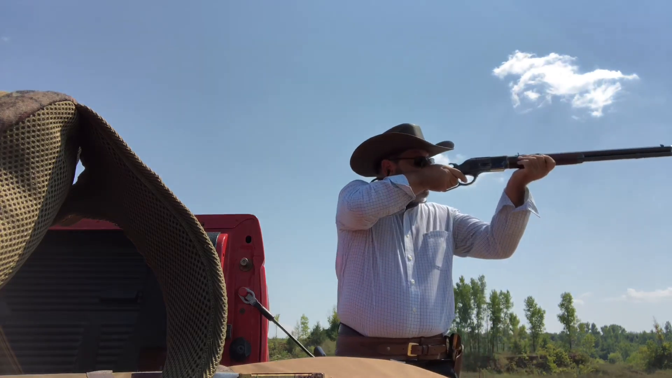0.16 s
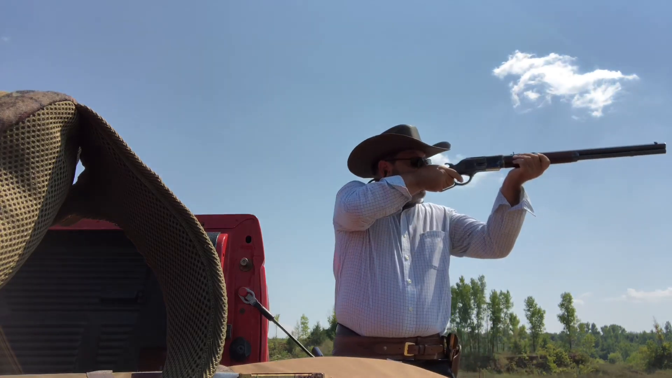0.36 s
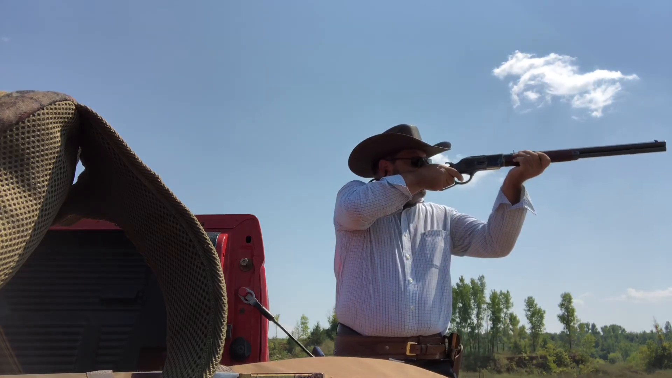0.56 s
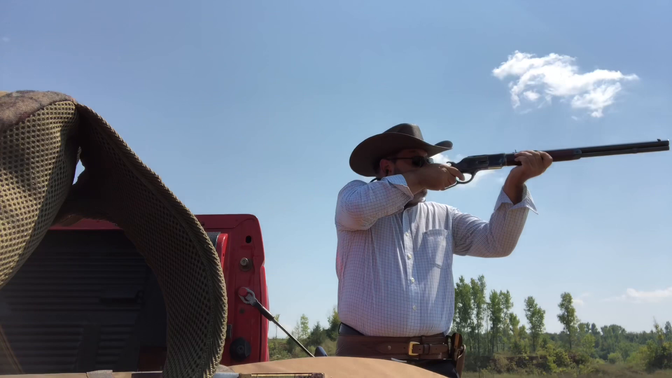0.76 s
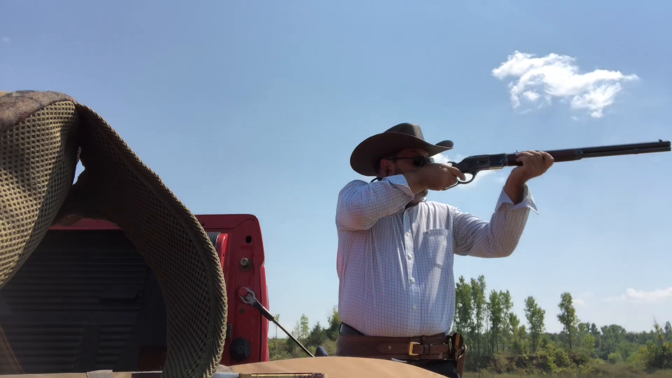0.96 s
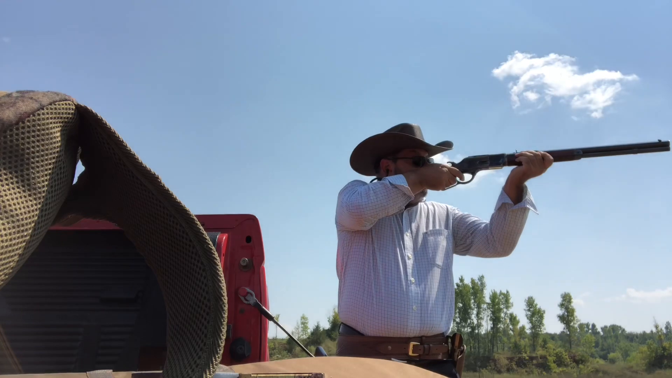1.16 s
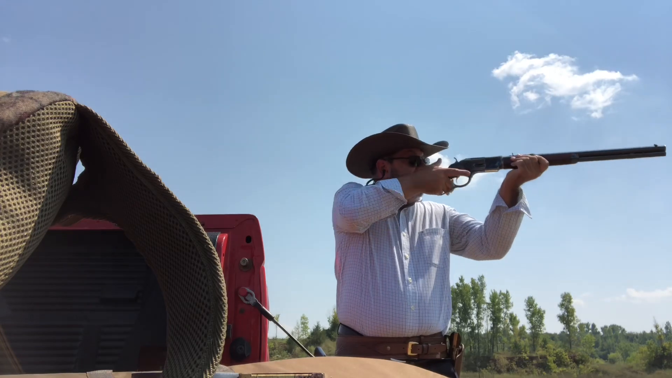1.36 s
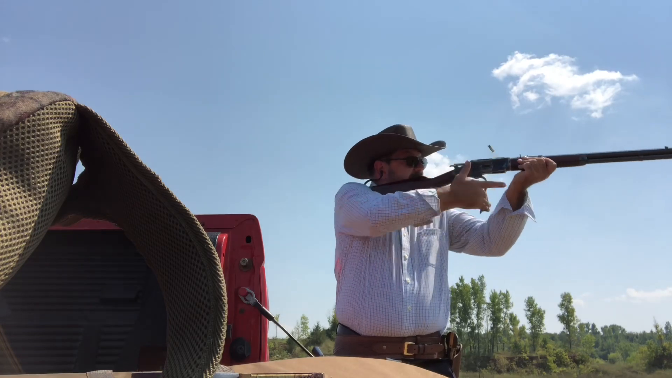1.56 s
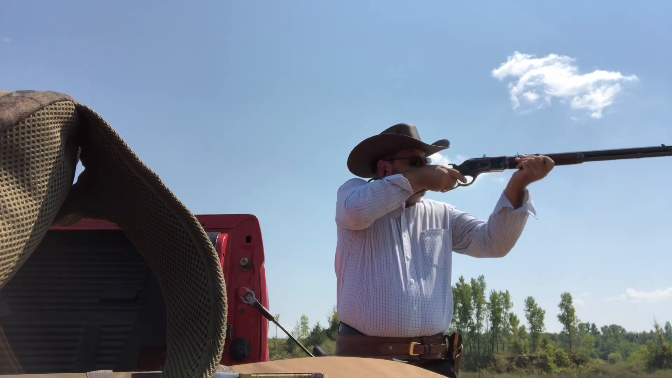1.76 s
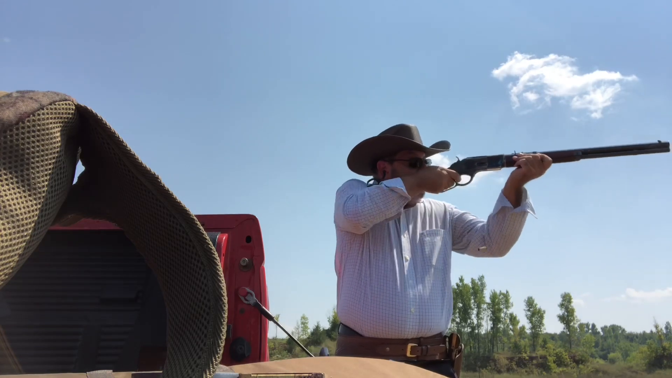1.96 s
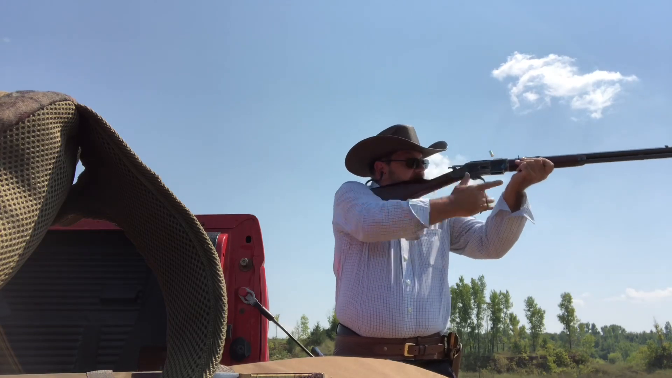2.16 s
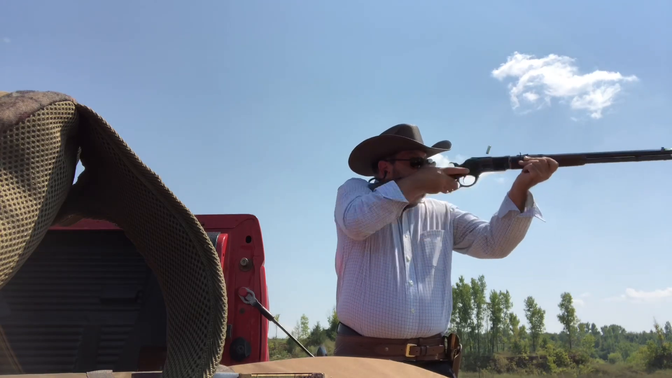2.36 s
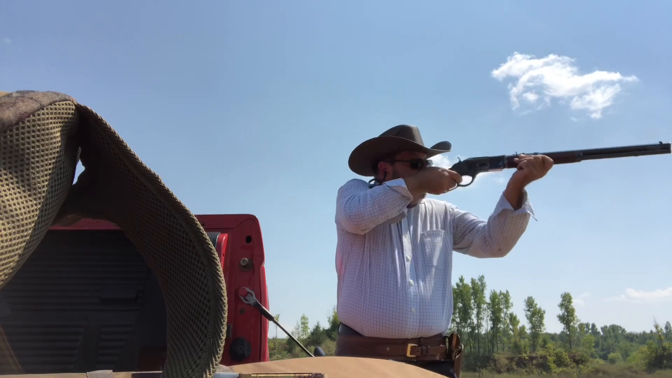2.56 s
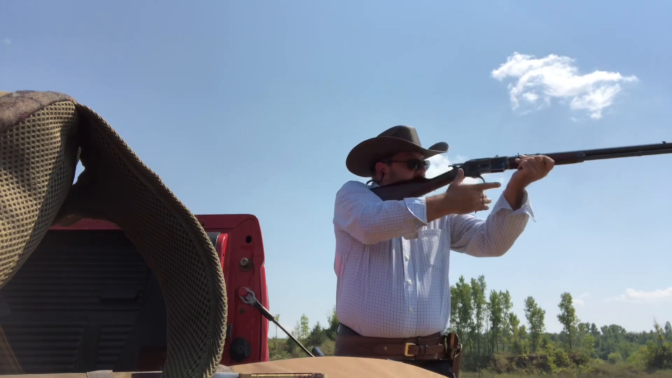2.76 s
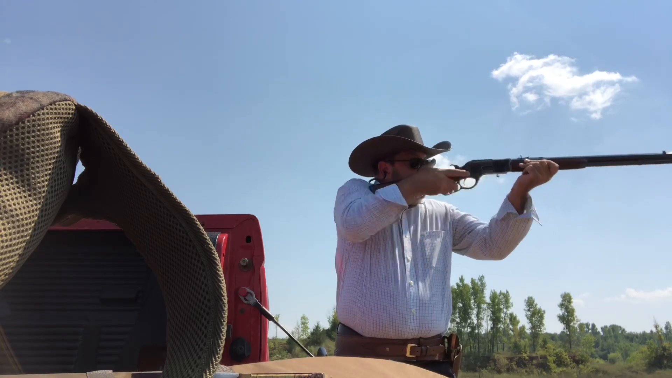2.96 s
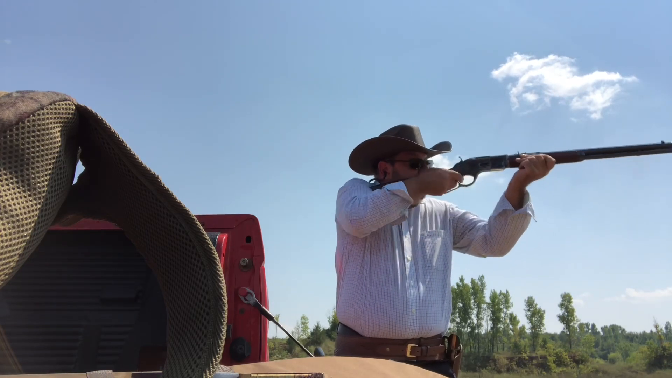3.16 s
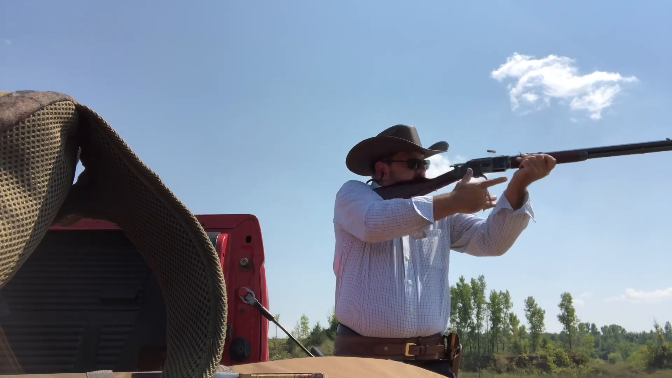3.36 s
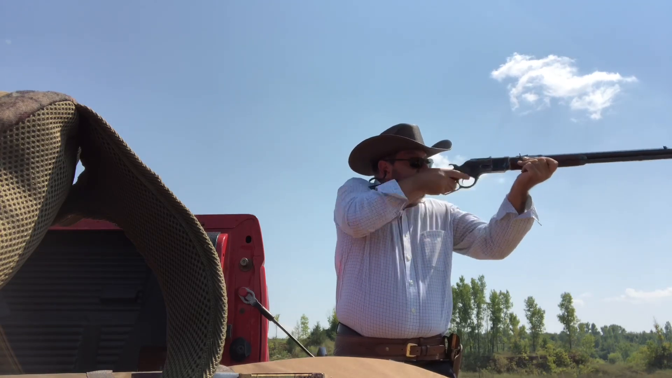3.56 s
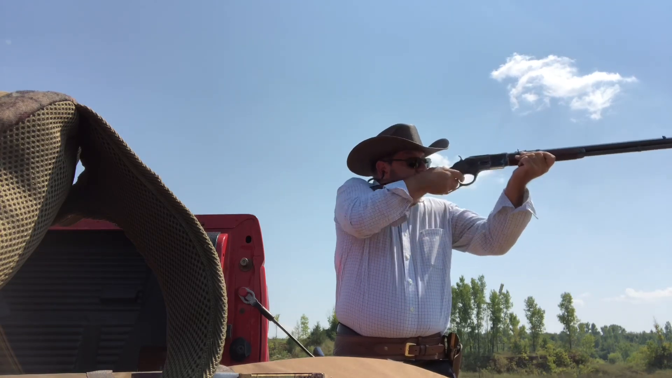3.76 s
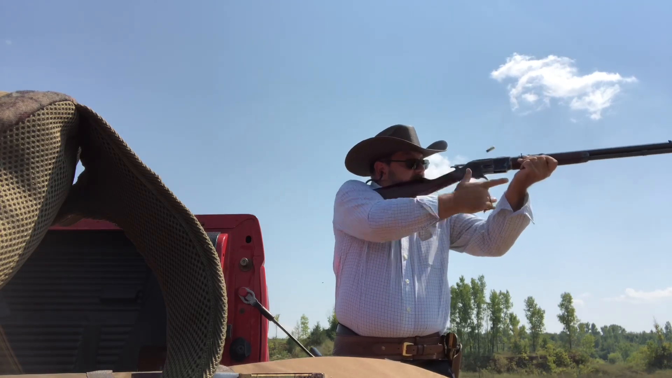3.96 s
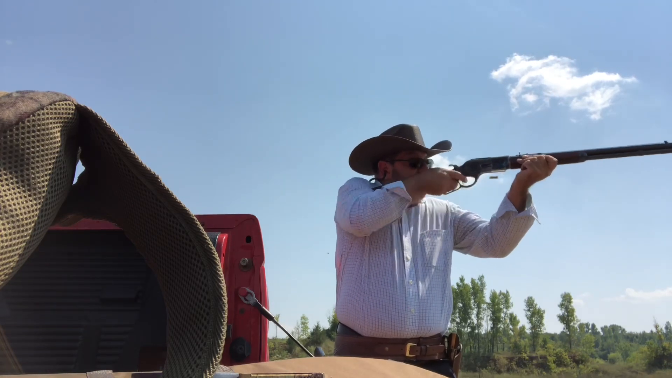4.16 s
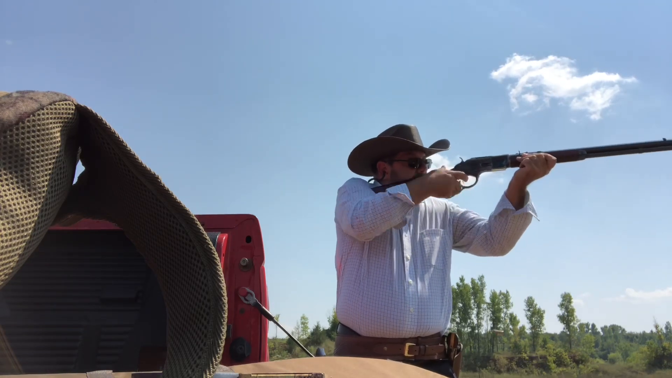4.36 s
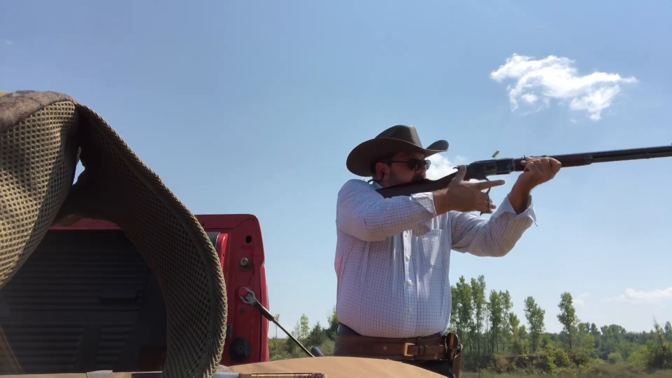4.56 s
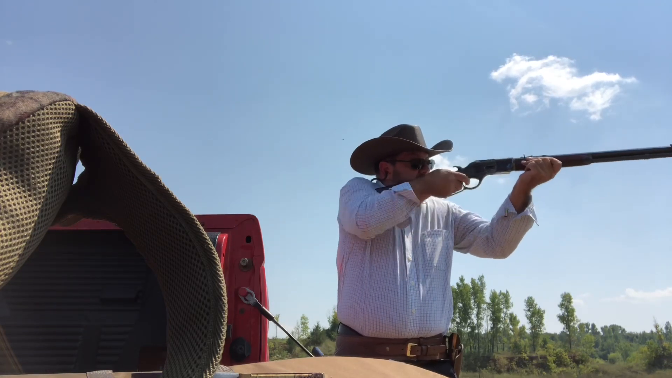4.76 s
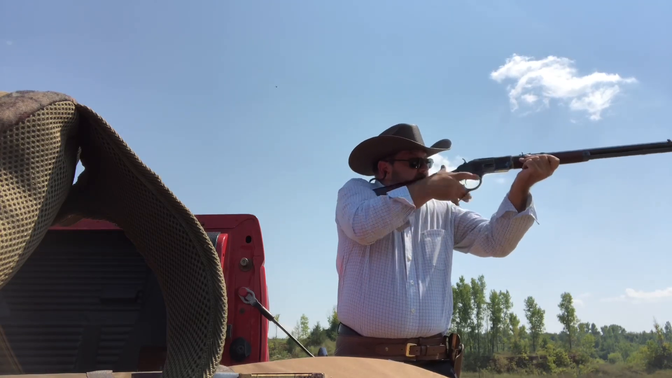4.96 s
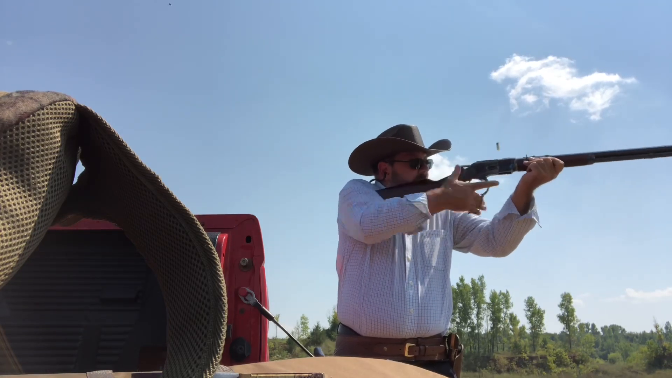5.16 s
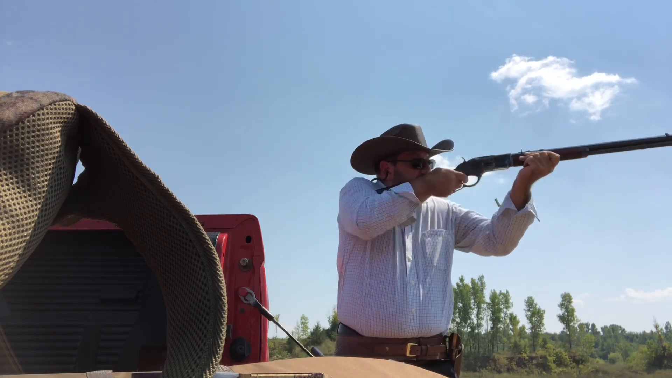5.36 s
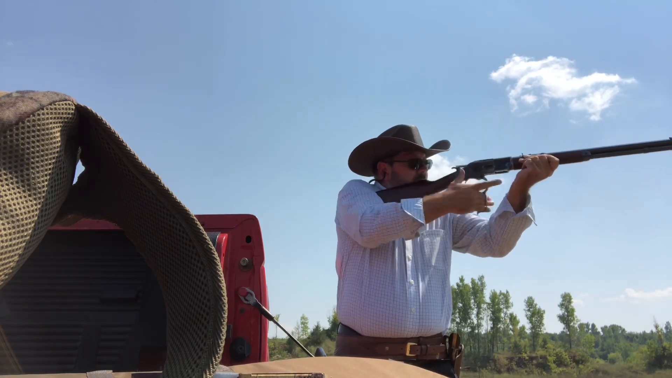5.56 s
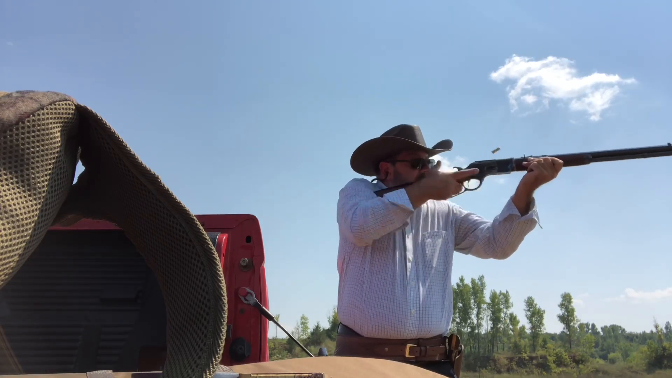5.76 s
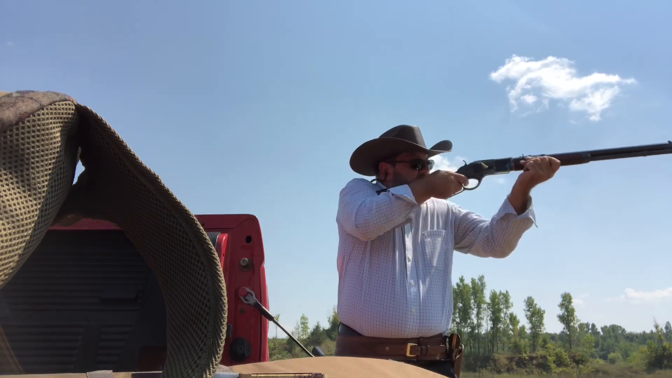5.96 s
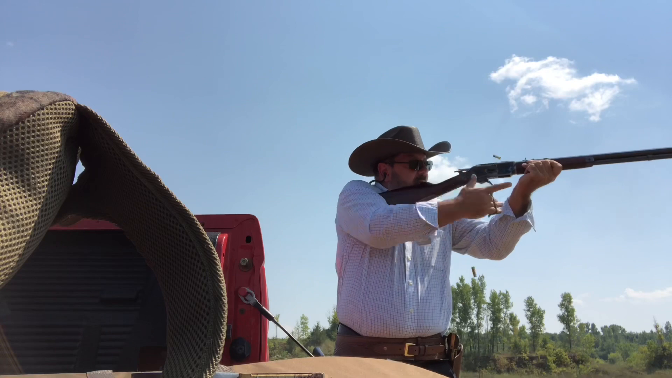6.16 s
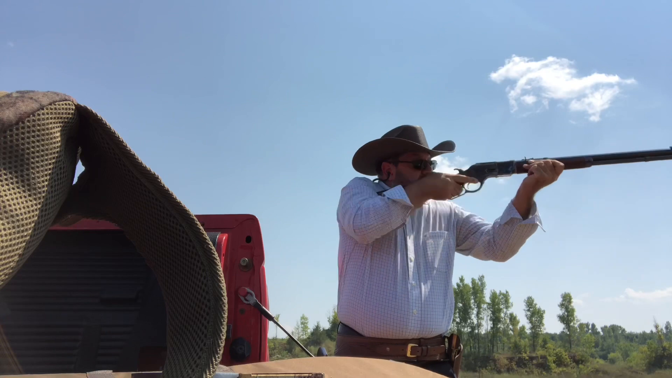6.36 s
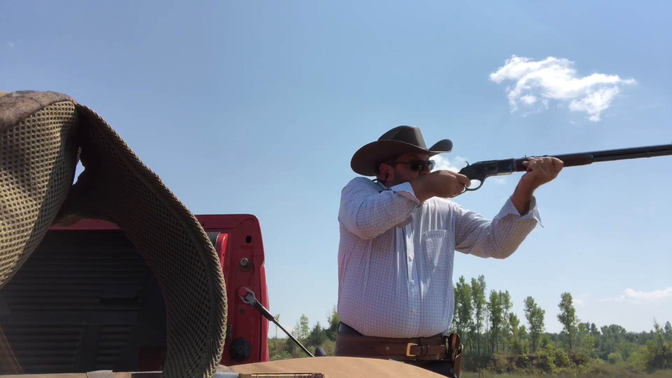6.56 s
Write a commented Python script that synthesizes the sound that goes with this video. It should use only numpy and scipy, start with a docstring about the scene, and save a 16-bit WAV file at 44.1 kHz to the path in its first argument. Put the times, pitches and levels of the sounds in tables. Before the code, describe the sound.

After a moment of low wind, rapid sharp rifle blasts ring out in open air, with steel clack-clack cycling and short scattered echoes.

```python
"""Outdoor shooting range: a lever-action rifle fires ten quick shots, heard beside a pickup truck.
Each blast is shaped noise over a gliding low thump; truck, ground, berm and trees answer in decaying noise.
After each of the first nine, a bullet smacks a target in a noise splash and the lever is thrown:
gritty noise scrapes, and steel contacts clack as noise cracks with ringing modes.
A low rumble of wind drops in level at the first shot, then creeps back, over a steady faint hiss of air."""
import sys
import numpy as np
from scipy import signal
from scipy.fft import rfft, irfft, next_fast_len
from scipy.io import wavfile
from scipy.ndimage import uniform_filter1d, map_coordinates

SR = 44100
rng = np.random.default_rng(int(sys.argv[2]) if len(sys.argv) > 2 else 0)


def persist_wave(psi):
    """Save psi, clipped to +-1, as 16-bit WAV."""
    counts = np.round(np.clip(psi, -1, 1) * 32767).astype(np.int16)
    wavfile.write(sys.argv[1], SR, np.atleast_2d(counts).T)


N = 291545  # length of the scene [samples]

# Wind rumble and open-air hiss, spectral shapes: (frequency [Hz], relative density [dB])
RUMBLE_SPECTRUM = [(25, -20), (55, -18.5), (78, -2.5), (93, -5.5), (110, -3), (135, -9.5), (200, -16.5),
                   (300, -21), (500, -44.5), (1000, -67.5)]
AIR_SPECTRUM = [(25, -22.5), (70, 1), (170, 6), (400, 0.5), (1100, -9), (3500, -11.5), (7000, -18),
                (13000, -32), (16000, -33.5)]
RUMBLE_DB, RUMBLE_WAVER_DB = -52, 2.3  # the rumble before the first shot, and its random waver
# the rumble drops in level at the first shot, then creeps back
RUMBLE_DROP_DB, RUMBLE_DROP_S, RUMBLE_RETURN_DB_PER_S = 30, .08, 1
GUST_S, GUST_WIDTH_S, GUST_DB = .68, 0.14, 3  # one soft gust

# Answers from truck and ground, open range, earth bank and tree line:
# (frequency [Hz], relative density [dB])
NEARBY_SPECTRUM = [(50, -14.5), (130, -12), (240, 5.5), (320, -2.5), (530, -2.5), (1000, 3.5), (1450, -0.5),
                   (1900, -5), (2700, -5), (4200, -7.5), (7000, -13.5), (10000, -18), (15500, -22.5)]
RANGE_SPECTRUM = [(40, -19), (120, 3.5), (350, 1.5), (550, 0), (850, 1.5), (1350, -9.5), (1900, -23.5),
                  (3000, -22), (5500, -24), (9000, -24), (15500, -21.5)]
BERM_SPECTRUM = [(60, -35), (130, -6.5), (190, -5), (300, -3.5), (500, -1.5), (800, -15), (1500, -11),
                 (4000, -27)]
TREES_SPECTRUM = [(50, -32.5), (170, -2), (350, -25), (800, -5), (1300, -10), (2000, -9), (3500, -6.5),
                  (5500, -11.5), (7500, -30.5), (15000, -44.5)]
# Decay of the open range: (frequency [Hz], time to fall 60 dB [s])
RANGE_DECAY = [(80, 0.32), (300, 0.39), (900, 0.48), (2500, 1), (5500, 1), (12000, 0.31)]
# Fade of the close reflections: (time after the blast's centre [s], relative level [dB])
NEARBY_FADE = [(0, -20.0), (.004, -25.0), (.012, -26.5), (.023, -23),
               (.034, -34.5), (.052, -36), (.075, -59), (.16, -71.0)]
ECHO_DB = -2  # the surroundings answer every shot at the same level
# Modes of the truck's panels: (frequency [Hz], relative level [dB])
TRUCK_MODES = [(210, -29), (396, -29), (525, -18.5), (743, -29), (925, -25.5), (1265, -34), (1452, -26),
               (1560, -46), (2240, -35), (2500, -26.5), (3040, -30.5), (3400, -34), (5080, -42)]
PANEL_T60_S = .085

# Bullets striking the targets: (time [s], relative level [dB])
TARGET_STRIKES = [(1.4258, -20.5), (2.1397, -27.5), (2.7632, -20), (3.3474, -26), (3.894, -20),
                  (4.4753, -30), (5.0279, -13.5), (5.5732, -30), (6.1265, -32)]
# Splash of a strike: (frequency [Hz], relative density [dB])
SPLASH_SPECTRUM = [(800, -40.5), (2200, -9.5), (3200, 0.5), (5500, -4.5), (8000, -9.0), (15000, -18.5)]

# Throws of the lever: (unlocked [s], fully open [s], cartridge seated [s], bolt shut [s],
# lever latched [s], relative level [dB], extra level of latch and rebound [dB])
LEVER_THROWS = [(1.5284, 1.5984, 1.7609, 1.7957, 1.8202, .5, -1),
                (2.2144, 2.2723, 2.4446, 2.4803, 2.5117, 1, 4.5),
                (2.815, 2.9004, 3.0629, 3.0954, 3.1203, .5, 2.5),
                (3.3923, 3.468, 3.6342, 3.6665, 3.689, -1, -12),
                (3.953, 4.0398, 4.2054, 4.2373, 4.2633, 0, 0),
                (4.5292, 4.6268, 4.7603, 4.8021, 4.8144, -.5, -6),
                (5.1096, 5.1896, 5.3317, 5.3657, 5.3882, 0, -1),
                (5.6373, 5.7078, 5.8732, 5.9103, 5.9352, -.5, -8),
                (6.2, 6.2707, 6.4355, 6.4499, 6.47, -1.5, -14)]
# Steel contacts of a throw, by name: (relative level [dB], low-end tilt [dB before scaling],
# treble tilt [dB before scaling])
STEEL_CONTACTS = {"unlock": (-28.5, -23, -14.5), "eject": (-32, 1.8, -9), "open": (-21, -3.5, -5),
                  "lift": (-30.5, -0.5, -8), "feed": (-29, 3.4, -15), "ramp": (-27.5, -7, -0.91),
                  "seat": (-13, -13, -6), "shut": (-20.5, 1.7, -8.5), "latch": (-26.5, 1, -6.5),
                  "rebound": (-38, 3.6, -11)}
# Steel crack and sliding rub, spectral shapes: (frequency [Hz], relative density [dB])
STEEL_SPECTRUM = [(180, -38), (300, -31), (1140, 3.5), (2320, -4), (2610, -6), (2880, -4.5), (4590, -12.5),
                  (5080, -3), (8640, -15), (9550, -4.5), (11100, -18), (13500, -15.5), (16000, -9)]
SCRAPE_SPECTRUM = [(300, -33), (700, -3), (1250, 3.5), (2100, -6.5), (2350, 0), (3000, -7.5), (6000, -12),
                   (9500, -16), (11500, -29), (16000, -15.5)]
# Modes of the rifle's action: (nominal frequency [Hz], relative level [dB])
ACTION_MODES = [(1080, 3.5), (1250, 10), (1600, 4), (1820, 6.5), (2330, 5), (3500, -6.5), (5400, -1),
                (6700, 7), (7900, 9), (9700, -5.5), (10500, 1.5), (13000, -9.5)]
RING_FALL = 0.2  # higher modes die sooner: t60 falls with this power of frequency
EJECT_LEAD_S = 0.027  # the case flies out just before the rear stop
LIFT_LEAD_S, FEED_LEAD_S, RAMP_LEAD_S = .045, .027, 0.019  # the next round's steps before it seats
REBOUND_S = .0185  # the latched lever rattles once more
# Slides around the rear stop and the seating: (lead [s], overrun [s], level [dB])
OPENING, CLOSING = (0.041, 0.025, -45.5), (.066, .064, -43.5)

# Shots: (blast centre [s], level of blast, lead-in, body and panels [dB], blast length [s],
# relative thump level [dB], relative level of the knock before it [dB])
RIFLE_SHOTS = [(1.2912, 1.5, 0.0074, -9, -4), (2.0098, 0.5, 0.004, -3, -0.5), (2.634, .5, 0.0036, 2, -30),
               (3.2169, -1.5, 0.0056, 1.5, -14), (3.763, -1.5, 0.0052, 2.5, -9.5),
               (4.3544, 2.5, 0.0025, 4, -15), (4.897, 0, 0.0038, .5, -8.5), (5.4305, 1.5, 0.0035, -7, 1),
               (5.988, -0.5, 0.004, 1.5, 0), (6.5634, -0.5, 0.0043, 1.5, 0.5)]
# Blast and the rising noise that leads into it, spectral shapes: (frequency [Hz], relative density [dB])
BLAST_SPECTRUM = [(60, -18), (200, -11), (400, -16.5), (600, -0.5), (1100, -7.5), (1950, -16), (2800, -8.5),
                  (3900, -7.5), (4600, -12), (5300, -16), (9500, -15), (11500, -21.5), (15500, -19.5)]
LEAD_IN_SPECTRUM = [(60, -26), (250, -18.5), (420, -17.5), (570, -5.5), (730, -8), (1000, -2), (1320, -23),
                    (1600, 2), (2050, -28.5), (2580, -4.5), (3600, -21.5), (5400, -16), (7000, -27),
                    (15000, -40)]
# Resonances that colour the blast: (frequency [Hz], width [Hz], nominal relative level [dB])
BLAST_RESONANCES = [(850, 110, -2), (1457, 157, 6.5), (2348, 380, 1.5), (3417, 130, -4.5),
                    (5520, 240, -6.5), (6990, 440, -6)]
PEAK_SCATTER_DB = 1.5  # the resonances differ in strength from shot to shot

TOP_HZ = 15950  # the microphone's band limit


def amp(db):
    """Decibels to gain."""
    return 10 ** (np.asarray(db) / 20)


def unit(x):
    """Scale a sound to rms 1."""
    return x / np.sqrt(np.mean(x ** 2) + 1e-20)


def along(points, hz):
    """Read (frequency, value) points on a log frequency axis."""
    f, v = np.transpose(points)
    return np.interp(np.log(hz + 1), np.log(f + 1), v)


def filtered(x, response):
    """Shape a sound by a response over frequency."""
    padded = next_fast_len(len(x) + 4096)
    spectrum = rfft(x, padded) * response(np.fft.rfftfreq(padded, 1 / SR))
    return irfft(spectrum, padded)[:len(x)]


def noise(spectrum, size):
    """Coloured noise of rms 1."""
    return unit(filtered(rng.standard_normal(size), lambda hz: amp(along(spectrum, hz))))


def burst(shape, colour, smooth_hz):
    """Noise under an envelope, flattened in spectrum and then coloured; keeps the envelope's energy."""
    z = rfft(shape * rng.standard_normal(len(shape)))
    bins = max(int(smooth_hz * len(shape) / SR), 1)
    local_power = np.abs(uniform_filter1d(np.abs(z) ** 2, bins))
    even = z / np.sqrt(local_power + 1e-12)
    x = irfft(even * colour(np.fft.rfftfreq(len(shape), 1 / SR)), len(shape))
    return x * np.linalg.norm(shape) / np.linalg.norm(x)


def fading(spectrum, t60s, size):
    """Noise in which each frequency dies at its own speed."""
    hz, t, z = signal.stft(noise(spectrum, size), SR, nperseg=512)
    decay = amp(-60 * t / along(t60s, hz)[:, None])
    return signal.istft(z * decay, SR, nperseg=512)[1][:size]


def wobble(rate, size):
    """A smooth random curve with rate knots a second."""
    knots = rng.standard_normal(int(size * rate / SR) + 4)
    return map_coordinates(knots, [np.arange(size) * rate / SR])


def add(track, s, sound):
    """Mix a sound into the track from time s on."""
    start = max(round(s * SR), 0)
    part = sound[:max(len(track) - start, 0)]
    track[start:start + len(part)] += part


def wind():
    """Wavering low noise with one gust drops in level at the first shot; a steady hiss of air lies beneath."""
    t = np.arange(N) / SR
    since = np.maximum(t - RIFLE_SHOTS[0][0], 0)
    gust_db = GUST_DB * np.exp(-((t - GUST_S) / GUST_WIDTH_S) ** 2)
    waver_db = RUMBLE_WAVER_DB * wobble(16, N)
    drop_db = RUMBLE_DROP_DB * np.minimum(since / RUMBLE_DROP_S, 1) - RUMBLE_RETURN_DB_PER_S * since
    rumble = amp(RUMBLE_DB + gust_db + waver_db - drop_db) * noise(RUMBLE_SPECTRUM, N)
    return rumble + amp(-63.5) * noise(AIR_SPECTRUM, N)


def surroundings(t):
    """Truck and ground answer a shot first; open range, earth bank and far tree line scatter it later."""
    after = np.maximum(t, 0)
    near_db = np.interp(t, *np.transpose(NEARBY_FADE))
    near = burst(amp(near_db) * (t > 0), lambda hz: amp(along(NEARBY_SPECTRUM, hz)), smooth_hz=119.7)
    build_up = 1 - np.exp(-after / 0.0097)
    far = amp(-27.0) * fading(RANGE_SPECTRUM, RANGE_DECAY, len(t)) * build_up
    berm = amp(-47.0) * np.exp(-((t - .14) / 0.032) ** 2) * noise(BERM_SPECTRUM, len(t))
    trees = amp(-55.5) * np.exp(-((t - .57) / .17) ** 2) * noise(TREES_SPECTRUM, len(t))
    # uneven ground and foliage return the sound in lumps
    lumps_db = 2.74 * wobble(61.77, len(t)) + 4.2 * wobble(350, len(t))
    return near + (far + berm + trees) * amp(lumps_db)


def panels(t):
    """The blast reaches the truck a moment late and rings its panels, each time at new strengths."""
    rung = np.maximum(t - .006, 0)
    hz, db = np.transpose(TRUCK_MODES)[:, :, None]
    size = amp(db + 2 * rng.standard_normal(hz.shape) - 60 * rung / PANEL_T60_S)
    modes = size * np.sin(2 * np.pi * hz * rung)
    return modes.sum(0) * (1 - np.exp(-rung / .006))


def strikes():
    """Lead smacks a distant target: a bright, short splash of noise with a weaker tail."""
    out, t = np.zeros(N), np.arange(SR // 6) / SR
    rise = 1 - np.exp(-t / .0007)
    for s, db in TARGET_STRIKES:
        shape = (amp(-60 * t / 0.013) + amp(-16.0 - 60 * t / 0.12)) * rise
        add(out, s, amp(db - 5.0) * shape * noise(SPLASH_SPECTRUM, len(t)))
    return out


def action_ring(t, t60):
    """The steel action's decaying modes, at new strengths and slightly shifted pitches each time."""
    hz, db = np.transpose(ACTION_MODES)[:, :, None]
    hz = hz * (1 + .03 * rng.standard_normal(hz.shape))  # bolt and lever move
    size = amp(db + 4 * rng.standard_normal(hz.shape))
    modes = size * np.sin(2 * np.pi * (hz * t + rng.random(hz.shape)))
    decay = amp(-60 * t / t60 * (hz / hz[0]) ** RING_FALL)
    return (modes * decay).sum(0) / np.sqrt(np.sum(size ** 2) / 2)


def slides():
    """The bolt slides back to its stop, then forward over the new round: (start s, end s, level dB)."""
    for _, open_s, seat_s, _, _, db, _ in LEVER_THROWS:
        for s, (lead, overrun, slide_db) in [(open_s, OPENING), (seat_s, CLOSING)]:
            yield s - lead, s + overrun, db + slide_db


def scrapes(grain_db, grain_rate, catch_rate, catch_db):
    """Bolt and lever rub with an even grain, louder as they move faster; small catches ring the action."""
    out, t = np.zeros(N), np.arange(SR // 40) / SR
    rub = unit(amp(grain_db * wobble(grain_rate, N)) * noise(SCRAPE_SPECTRUM, N))
    for start, end, db in slides():
        size = round((end - start) * SR)
        speed = np.abs(np.sin(np.pi * np.linspace(0, 1, size) ** 0.77)) ** 0.65
        catches = ((rng.random(SR) < catch_rate / SR) * rng.uniform(0.4, 1, SR))[:size]
        tick = action_ring(t, t60=0.0056) + amp(-60 * t / 0.026) * noise(SCRAPE_SPECTRUM, len(t))
        rattle = unit(signal.fftconvolve(catches, tick))[:size]
        rubbing = rub[round(start * SR):][:size]
        add(out, start, amp(db) * speed * (rubbing + amp(catch_db) * rattle))
    return out


def contacts():
    """Every throw makes the same chain of contacts: (time s, name, dB over that contact's usual level)."""
    for unlock_s, open_s, seat_s, shut_s, latch_s, db, latch_db in LEVER_THROWS:
        yield from [(unlock_s, "unlock", db),
                    (open_s - EJECT_LEAD_S, "eject", db),
                    (open_s, "open", db),
                    (seat_s - LIFT_LEAD_S, "lift", db),
                    (seat_s - FEED_LEAD_S, "feed", db),
                    (seat_s - RAMP_LEAD_S, "ramp", db),
                    (seat_s, "seat", db),
                    (shut_s, "shut", db),
                    (latch_s, "latch", db + latch_db),
                    (latch_s + REBOUND_S, "rebound", db + latch_db)]


def clacks():
    """Steel meets steel: a short noise crack, a brief modal ring and a scatter off the surroundings."""
    out, t = np.zeros(N), np.arange(SR // 10) / SR
    rise = 1 - np.exp(-t / .0006)
    crack = amp(-60 * np.maximum(t - .0025, 0) / .018)
    scatter = amp(-20.5 - 60 * t / .15)
    for s, name, force_db in contacts():
        db, knock_db, top_db = STEEL_CONTACTS[name]
        struck = (crack + scatter) * noise(STEEL_SPECTRUM, len(t))
        hit = (struck + amp(-6) * action_ring(t, t60=0.065)) * rise
        # each contact has its own tilt at the low end and in the treble
        colour = [(1400, 0.49 * knock_db + 5.0), (3000, 0.031), (6000, 0.0065), (10000, 0.8 * top_db + 9.5)]
        coloured = filtered(hit, lambda hz: amp(along(colour, hz)))
        add(out, s, amp(db + force_db - 9.0) * coloured)
    return out


def blast_colour(hz):
    """A broad crack with a few strong resonances."""
    peaks = 0
    for centre, width, db in BLAST_RESONANCES:
        power = amp(db + PEAK_SCATTER_DB * rng.standard_normal()) ** 2
        peaks = peaks + power / (1 + (2 * (hz - centre) / width) ** 2) ** 2
    return np.sqrt(amp(along(BLAST_SPECTRUM, hz)) ** 2 + peaks)


def thump(t, start_hz, end_hz, glide, centre, width, thump_db, knock_db):
    """The blast's low push: a short knock that sinks in pitch into one big swing."""
    hz = end_hz + (start_hz - end_hz) * (1 - np.tanh((t - centre / 2) / glide)) / 2
    phase = 2 * np.pi * np.cumsum(hz) / SR
    swing = amp(thump_db) * np.exp(-((t - centre + .0015) / width) ** 2)
    knock = amp(knock_db) * np.exp(-((t - .003) / .009) ** 2)
    return (swing + knock) * np.cos(phase - np.interp(centre, t, phase))


def shots():
    """A short rising noise leads into each hard noise blast; close surfaces answer at once, then the range."""
    out, before = np.zeros(N), .04
    t = np.arange(SR) / SR - before  # zero at the blast's centre
    brief = t[:SR // 5]
    fade_in = np.interp(brief, [-.024, -.022, -.008], [0, .4, 1])
    # rifle and surfaces stay put, so the echoes keep much the same pattern from shot to shot
    pattern = surroundings(t)
    for s, db, length, thump_db, knock_db in RIFLE_SHOTS:
        flat_top = 1 / np.sqrt(1 + (2 * brief / length) ** 10)
        blast = amp(-7.5) * burst(flat_top, blast_colour, smooth_hz=330)
        # a steep rise up to the blast, a steeper fall after its centre
        rise_db = -1150 * np.maximum(-brief - length / 2, 0) - 3000 * np.maximum(brief, 0)
        lead_in = burst(amp(rise_db), lambda hz: amp(along(LEAD_IN_SPECTRUM, hz)), smooth_hz=121.2)
        lead_in = amp(-16.0) * lead_in * fade_in
        # a longer blast carries more low-mid body
        body_db = -30 + 45 * np.log10(length / 0.0036)
        body_shape = amp(body_db) * np.exp(-((brief - .002) / length) ** 2)
        body = burst(body_shape, lambda hz: np.exp(-((hz - 560) / 320) ** 2), smooth_hz=48.2)
        push = amp(-25.0) * thump(brief, start_hz=232.4, end_hz=59, glide=.0032, centre=.0225,
                                  width=0.012, thump_db=thump_db, knock_db=knock_db)
        add(out, s - before, amp(db) * (blast + lead_in + body + panels(brief)) + push)
        echo = .8 * pattern + .7 * surroundings(t)
        add(out, s - before, amp(ECHO_DB) * echo)
    return out


def scene():
    """The open air, the target strikes, the rifle's action and its shots."""
    action = scrapes(grain_db=3, grain_rate=300, catch_rate=160, catch_db=-2) + clacks()
    return (wind() + strikes() + action + shots())[None]


def record(dry):
    """The blasts overload the microphone, which rolls off steeply at its band limit."""
    overloaded = dry[0] / (1 + (dry[0] / .95) ** 6) ** (1 / 6)
    return filtered(overloaded, lambda hz: (1 - np.tanh((hz - TOP_HZ) / 150)) / 2)[None]


dry = scene()
out = record(dry)
persist_wave(out)
```